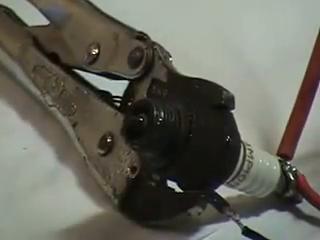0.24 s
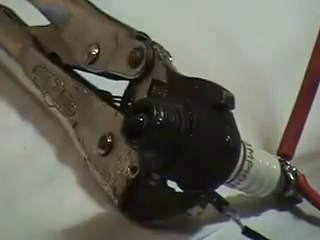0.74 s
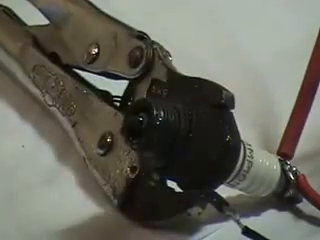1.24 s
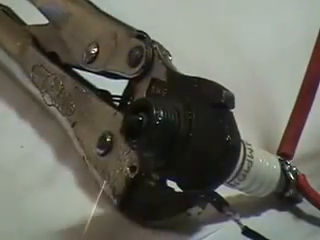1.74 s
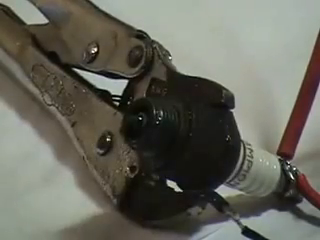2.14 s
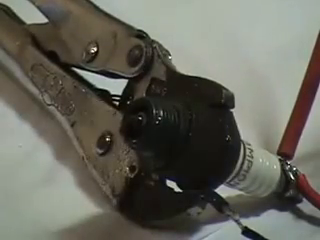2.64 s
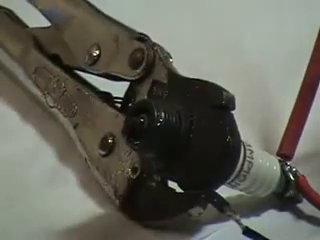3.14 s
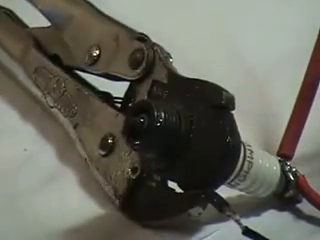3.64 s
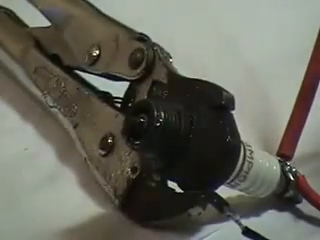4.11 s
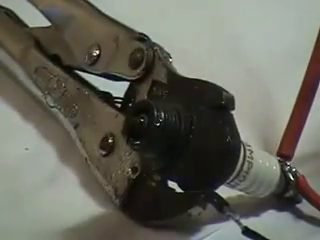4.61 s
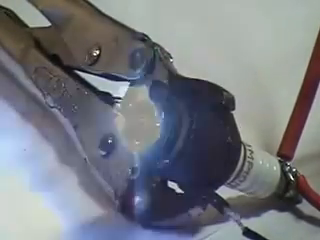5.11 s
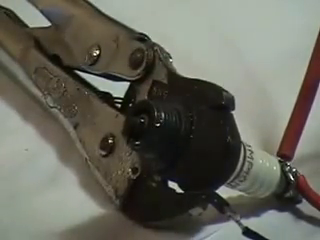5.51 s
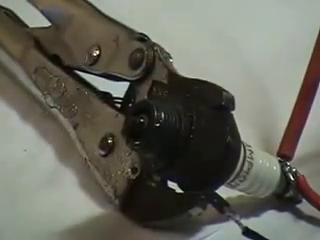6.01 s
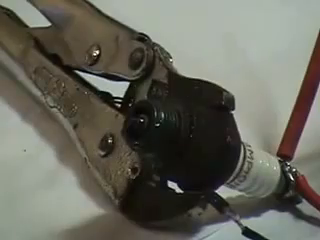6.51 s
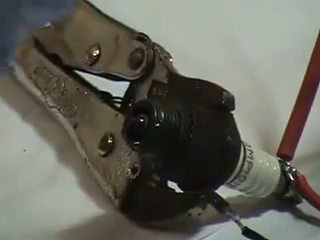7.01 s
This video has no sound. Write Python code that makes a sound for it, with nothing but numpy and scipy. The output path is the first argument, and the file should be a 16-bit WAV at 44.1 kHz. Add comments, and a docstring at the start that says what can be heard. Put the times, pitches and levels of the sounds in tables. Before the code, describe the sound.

A water-wetted spark plug clamped in pliers on a workbench fires about three times every two seconds. Each spark is a loud, sharp crack with a pop that overloads the close microphone and rings briefly in a small, hard room. Halfway between sparks a relay gives a soft click. A very faint electrical hum and room hiss continue underneath.

```python
"""A water-wetted spark plug, held in pliers on a workbench, fires every 0.68 s.
Each spark flashes water to steam: a blast that overloads the close two-port microphone, and a crack
that rings the plug's cavity, the pliers, the bench and a small hard room.
The supply hums faintly over room air. Midway between sparks the timing relay clicks."""
import sys
import numpy as np
from scipy import signal
from scipy.fft import rfft, irfft, next_fast_len
from scipy.io import wavfile

SR = 44100
rng = np.random.default_rng(int(sys.argv[2]) if len(sys.argv) > 2 else 0)


def bounce(signal):
    """Save signal as a 16-bit WAV file at the path given by the first command-line argument."""
    frames = np.transpose(np.atleast_2d(signal))
    limited = np.clip(frames, -1, 1)
    pcm = np.round(limited * 32767).astype(np.int16)
    wavfile.write(sys.argv[1], SR, pcm)


N = 320155

# sparks in firing order, set by the water left in the plug's mouth: level/dB, cavity f/Hz
SHOTS = [(0.5, 4650), (6, 4470), (1.95, 4570), (1.45, 4790), (2.5, 4670), (5, 4510), (3, 4550), (2.2, 4680),
         (2.5, 4510), (0, 4840), (1.5, 4810)]
# spark spectrum in the room: f/Hz, relative level/dB
CRACK_SPECTRUM = [(40, -25), (200, -20.5), (400, -12), (700, -5), (1300, -4), (2300, 0), (3100, -2.5),
                  (4200, -1.5), (6000, -2.5), (8000, 0.5), (10000, -5), (12300, -19.5), (13500, -21),
                  (15000, -45.5)]
# bench and steel plier resonances: f/Hz, width/Hz, lift/dB
BENCH_MODES = [(618, 48, 2.5), (777, 84, 4.5), (968.6, 31, 6.5), (1152, 8.3, 7), (1300, 40, 3.5),
               (1603, 24, 6.5), (2460, 250, 1), (3710, 43, 7), (4000, 49, 4), (4080, 20, 2.5),
               (4210, 11, 4), (4457, 8.3, 3.5), (4700, 16, 4.5), (5940, 20, 4.5), (6300, 32, 7.5),
               (6740, 18, 7.5), (6920, 30, 7), (7750, 14, 4)]
# early spark reflections: t/s, level/dB over the diffuse sound
EARLY_ECHOES = [(.0036, -5), (.0095, 1.5), (0.018, 3)]
# room decay: f/Hz, t60/s
ROOM_DECAY = [(100, .3), (250, 0.33), (600, 0.52), (1800, 0.55), (4500, 0.48), (8000, 0.47), (13000, 0.34)]
# microphone ports: f/Hz, correlation/1, left minus right level/dB
MIC_PORTS = [(150, 0.66, -3), (500, .6, -4), (1300, 0.26, -4.5), (2800, 0.34, -1.9), (5500, 0.69, -2),
             (10000, 1, -1.2)]
# room air spectrum: f/Hz, relative level/dB
AIR_SPECTRUM = [(30, -13), (70, -13.5), (130, -2.5), (350, -7), (700, 1), (1300, -3.5), (2500, -7),
                (4500, -7), (6000, -11), (8500, -12), (10500, -20), (14000, -44)]
# supply hum and whine, right port: f/Hz, rms level/dB
HUM_LINES = [(120, -84.5), (240, -72.5), (590, -74), (765, -83), (1648, -71.5), (1687, -73)]
# armature landing, bounces and near echoes: t/s, relative level/dB
RELAY_HITS = [(0, -9), (.0014, 4), (.0062, -5.5), (.017, -7.5), (0.0242, -11), (.041, -11.5), (0.067, -20)]
# relay body modes: f/Hz, relative level/dB, t60/s
RELAY_BODY = [(2424, -2, 0.019), (3020, 0.5, 0.0076), (3080, -4, 0.011), (4180, -9.5, 0.0059),
              (8900, -8.5, 0.006)]
# relay spectrum in the room: f/Hz, relative level/dB
RELAY_SPECTRUM = [(300, -25.5), (700, -6.5), (1200, -16.5), (1900, -9), (2400, 2.5), (2750, -5.5),
                  (3200, -1.5), (3900, -11), (6000, -18.5), (12000, -39.5)]

FIRST_SPARK_S, PERIOD_S = -0.1199, .67938  # first spark still rings at t = 0
FIRING_S = FIRST_SPARK_S + PERIOD_S * np.arange(len(SHOTS))


def from_db(db):
    """Decibels to gain."""
    return 10 ** (np.asarray(db) / 20)


def at_hz(table, hz, column=1):
    """Table column, interpolated over log frequency."""
    table = np.array(table)
    return np.interp(np.log(hz + 1), np.log(table[:, 0]), table[:, column])


def add(out, start_s, sound):
    """Mix a stereo sound in at start_s."""
    start = round(start_s * SR)
    first, last = max(start, 0), min(start + sound.shape[1], N)
    out[:, first:last] += sound[:, first - start:last - start]


def stereo_noise(colour, size, left_lead_s=.00002):
    """Diffuse noise at the two ports: rms 1, partly correlated, left first."""
    hz = np.fft.rfftfreq(size, 1 / SR)
    correlation = np.clip(at_hz(MIC_PORTS, hz), -1, 1)
    sides = np.array([[1], [-1]])
    mid, side = rfft(rng.standard_normal((2, size)))
    pair = np.sqrt(1 + correlation) * mid + np.sqrt(1 - correlation) * side * sides
    pair *= from_db(at_hz(colour, hz) + sides * at_hz(MIC_PORTS, hz, column=2) / 2)
    pair *= np.exp(1j * np.pi * hz * sides * left_lead_s)
    noise = irfft(pair, size)
    return noise / np.std(noise)


def room_tail(colour, t):
    """Room response to a click: noise decaying band by band."""
    hz = np.fft.rfftfreq(len(t), 1 / SR)
    spectrum = rfft(stereo_noise(colour, len(t)))
    centres_hz, t60s = np.transpose(ROOM_DECAY)
    tail = 0
    for weights, t60_s in zip(np.eye(len(centres_hz)), t60s):
        band = np.interp(np.log(hz + 1), np.log(centres_hz), weights)
        tail += irfft(spectrum * band, len(t)) * from_db(-60 * t / t60_s)
    return tail


def resonance(x, hz, width_hz, db):
    """Narrow-band lift; an antiresonance for db < 0."""
    band = signal.lfilter(*signal.iirpeak(hz, hz / width_hz, fs=SR), x + 1e-18)
    return x + (from_db(db) - 1) * band


def cavity(x, hz, width_hz=380, ring_db=7, notch_db=-8, notch_ratio=1.11):
    """The hollow round the electrode rings and cancels a band just above its pitch."""
    ringing = resonance(x, hz, width_hz, ring_db)
    return resonance(ringing, notch_ratio * hz, width_hz, notch_db)


def blast(t, front_s=.0004, swing_s=0.00082, damping=1.17, front_db=4, swing_db=15,
          steam_hz=1100, left_db=-11, left_highpass_hz=150):
    """Pressure wave of the flashed water: short front, deep swing, slow rebound."""
    front = from_db(front_db) * np.sin(np.pi / 2 * t / front_s)
    progress = np.maximum(t - front_s, 0) / swing_s
    swing = from_db(swing_db) * (progress - 1) * np.exp(-damping * progress)
    wave = np.where(t < front_s, front, swing)
    # steam takes time to expand: rounded edges
    right = signal.sosfilt(signal.butter(2, steam_hz, fs=SR, output="sos"), wave + 1e-18)
    # sheltered left port: less level, less bass
    shelter = signal.butter(1, left_highpass_hz, "high", fs=SR, output="sos")
    left = from_db(left_db) * signal.sosfilt(shelter, right)
    return np.array([left, right])


def sparks(t, room_db=-11, crack_db=3, crack_s=.005, rise_s=0.00057, echo_s=0.00053, shared_power=0.73):
    """Blast, crack and echoes per firing; same room, new arc path each time."""
    early_power = from_db(crack_db) ** 2 * np.exp(-t / crack_s)
    for delay_s, db in EARLY_ECHOES:
        early_power += from_db(db) ** 2 * np.exp(-((t - delay_s) / echo_s) ** 2)
    envelope = from_db(room_db) * np.sqrt(1 + early_power) * np.minimum(t / rise_s, 1) ** 2
    shared_tail = np.sqrt(shared_power) * room_tail(CRACK_SPECTRUM, t)
    blasts, cracks = np.zeros((2, 2, N))
    for start_s, (db, cavity_hz) in zip(FIRING_S, SHOTS):
        fresh_tail = np.sqrt(1 - shared_power) * room_tail(CRACK_SPECTRUM, t)
        crack = envelope * (shared_tail + fresh_tail)
        add(cracks, start_s, from_db(db) * cavity(crack, cavity_hz))
        add(blasts, start_s, from_db(db) * blast(t))
    for hz, width_hz, db in BENCH_MODES:
        cracks = resonance(cracks, hz, width_hz, db)
    return blasts + cracks


def supply_hum(waver_hz=0.91, waver_knots=100, left_db=-3):
    """Hum and whine of the supply; each line wavers slightly in pitch."""
    t = np.arange(N) / SR
    knots_s = np.linspace(0, N / SR, waver_knots)
    hum = 0
    for hz, db in HUM_LINES:
        pitch_hz = hz + waver_hz * np.interp(t, knots_s, rng.standard_normal(waver_knots))
        hum += np.sqrt(2) * from_db(db) * np.sin(2 * np.pi * np.cumsum(pitch_hz) / SR)
    return hum * from_db([[left_db], [0]])


def room_air(rms_db=-59):
    """Steady diffuse noise of the room."""
    return from_db(rms_db) * stereo_noise(AIR_SPECTRUM, next_fast_len(N))[:, :N]


def relay(t, delay_s=.335, gain_db=-22, direct_db=-3, room_db=-21, left_db=-6.5, band_hz=(2050, 7000)):
    """After each spark the armature drops back and bounces, ringing the body and, faintly, the room."""
    click = 0
    for hit_s, hit_db in RELAY_HITS:
        age_s = np.maximum(t - hit_s, 0)
        for hz, db, t60_s in RELAY_BODY:
            click += from_db(hit_db + db - 60 * age_s / t60_s) * np.sin(2 * np.pi * hz * age_s)
    # small body radiates no bass; case dulls the top
    click = signal.sosfilt(signal.butter(2, band_hz, "band", fs=SR, output="sos"), click + 1e-18)
    direct = click * from_db(direct_db) * from_db([[left_db], [0]])
    tail = from_db(room_db) * room_tail(RELAY_SPECTRUM, t)
    out = np.zeros((2, N))
    for start_s in FIRING_S + delay_s:
        add(out, start_s, from_db(gain_db) * (direct + tail))
    return out


def scene(ring_s=.9):
    """Sparks and relay alternate over hum and air."""
    t = np.arange(next_fast_len(int(ring_s * SR))) / SR
    return sparks(t) + relay(t) + supply_hum() + room_air()


def gain_control(x, threshold_db=-5, release_db_per_s=24, attack_s=0.0021):
    """Peaks pull the gain down; it recovers at a steady dB rate."""
    level_db = 20 * np.log10(np.clip(np.abs(x).max(axis=0), 1e-9, 1))
    excess_db = np.maximum(level_db - threshold_db, 0)
    ramp_db = release_db_per_s * np.arange(N) / SR
    held_db = np.maximum.accumulate(excess_db + ramp_db) - ramp_db
    pole = np.exp(-1 / (attack_s * SR))
    return x * from_db(-signal.lfilter([1 - pole], [1, -pole], held_db))


def record(dry, ceiling=.92, cutoff_hz=15900):
    """The blast outruns the gain control and saturates; the top is cut."""
    x = gain_control(dry)
    clipped = x / (1 + (x / ceiling) ** 12) ** (1 / 12)
    return signal.sosfiltfilt(signal.cheby2(8, 40, cutoff_hz, fs=SR, output="sos"), clipped)


dry = scene()
out = record(dry)
bounce(out)
```